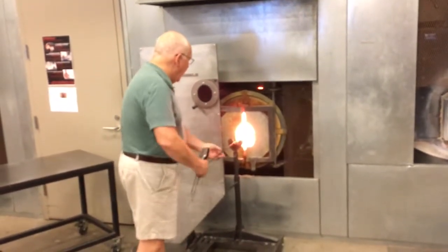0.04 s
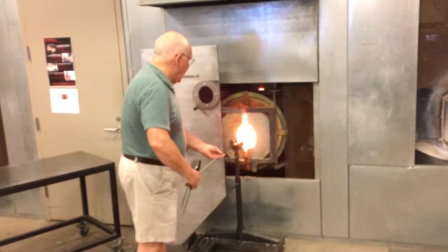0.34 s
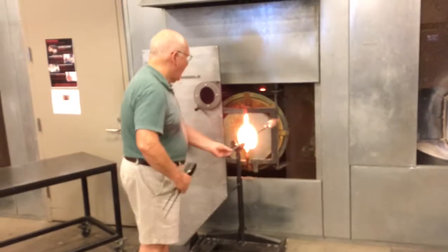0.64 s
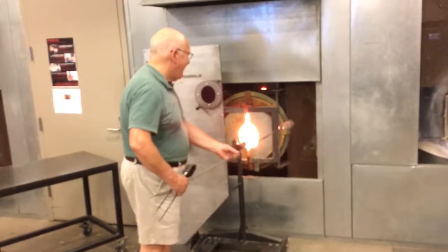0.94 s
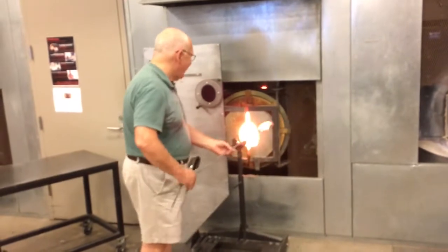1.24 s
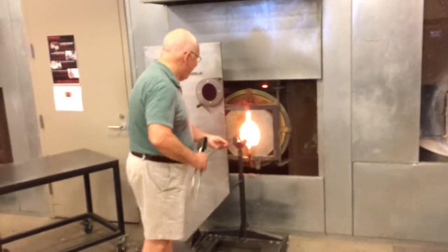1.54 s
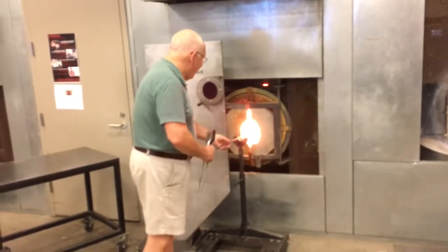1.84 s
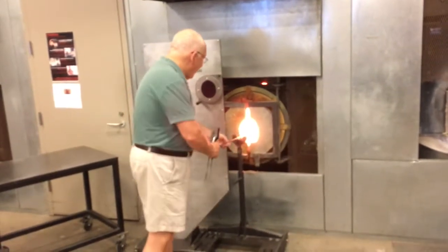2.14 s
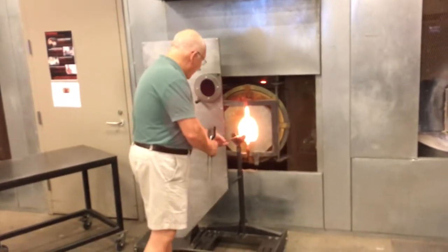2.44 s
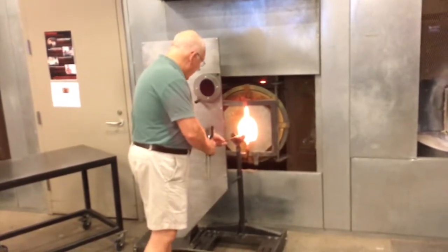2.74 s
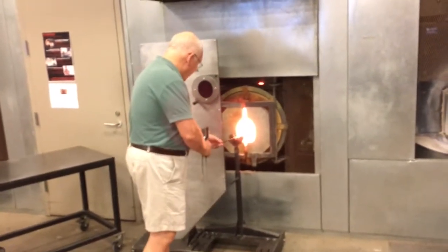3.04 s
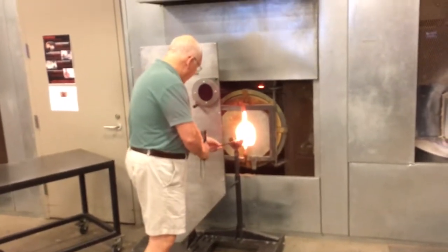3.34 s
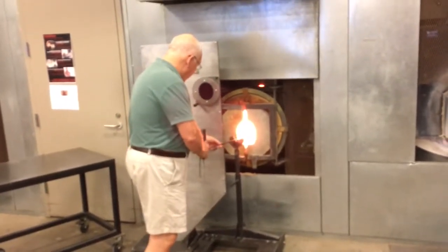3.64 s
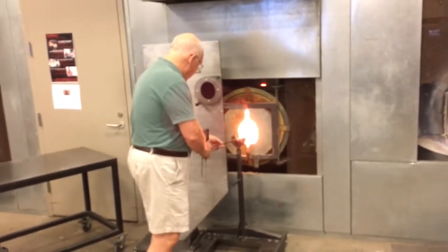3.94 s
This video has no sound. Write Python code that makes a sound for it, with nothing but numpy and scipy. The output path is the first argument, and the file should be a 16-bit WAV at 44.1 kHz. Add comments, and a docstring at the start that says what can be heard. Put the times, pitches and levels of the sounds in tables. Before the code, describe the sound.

A gas furnace roars steadily with rushing air, a tool clink and light shoe scuffs.

```python
"""A gas furnace roars steadily in a glass workshop as its swirling flame booms in the chamber.
Air from its blower and extraction hood rushes through ducts and hisses at the openings, and the
blower motor adds a thin, squeaky whine. A steel hand tool clinks. Shoes scuff and knock on the
concrete floor, grit ticks under them, and later something rings faintly. Hard walls give these
brief sounds a short echo."""
import sys
import numpy as np
from scipy import signal
from scipy.fft import rfft, irfft, next_fast_len
from scipy.io import wavfile
from scipy.ndimage import map_coordinates

SR = 44100
rng = np.random.default_rng(int(sys.argv[2]) if len(sys.argv) > 2 else 0)


def to_wav(sig):
    """Store sig (one row per channel, or 1-D mono) as 16-bit WAV at the path in sys.argv[1].

    Samples outside -1..1 are clipped; the rate is SR.
    """
    pcm = np.clip(np.atleast_2d(sig), -1, 1) * 32767
    pcm = np.round(pcm).astype(np.int16)
    wavfile.write(sys.argv[1], SR, pcm.T)  # frames by channels


N = 176400  # 4 seconds

# The deep tone of the flame (frequency [Hz], relative level [dB])
FLAME_TONE = [(15, -26), (25, -42), (40, -18.5), (55, -8.5), (65, -8.5), (75, 1.5), (88, -7.5), (102, -2.5),
              (128, -2.5), (152, 0.5), (185, -2), (214, -12), (234, -8), (280, -20), (315, -21), (360, -25),
              (420, -33.5), (510, -32.5), (550, -36), (750, -67)]


def furnace():
    """A swirling flame booms in the furnace chamber, with a slight flutter."""
    level_db = -24.5 + 0.5 * wobble(rate=8.74)
    return amp(level_db) * noise(FLAME_TONE)


# The tone of air in the hood and ducts (frequency [Hz], relative level [dB])
DUCT_TONE = [(320, -40), (555, -15), (600, 2.5), (705, 1), (765, -5), (820, -4.5), (920, 1.5), (985, -2),
             (1070, 0.5), (1150, -1), (1180, -11), (1250, -9.5), (1490, -11.5), (1640, -6.5), (1850, -14.5),
             (2040, -15.5), (2140, -11), (2220, -16), (2450, -11.5), (2700, -18.5), (2890, -19),
             (3080, -14), (3330, -21.5), (3600, -27.5), (4550, -51)]
# How the rush of air swells and eases (time [s], level change [dB])
DRAUGHT = [(0, 1), (.7, -0.1), (1.4, 0.16), (2.1, 0.1), (2.8, 0), (3.4, 0), (3.85, 1.5), (4, .5)]
# Evenly spaced peaks and dips that the blower puts in that tone (frequency [Hz], depth [dB])
BLOWER_RIPPLE = [(500, 15.5), (620, 0), (850, -1.2), (1080, 4.5), (1170, -6.5), (1400, 2)]
# The tone of the hiss at the openings (frequency [Hz], relative level [dB])
HISS_TONE = [(2500, -33), (3300, -5.5), (3550, -1.5), (4500, -2.5), (4950, -6), (5800, -4.5), (7000, -8.5),
             (8000, -8.5), (9700, -9.5), (10350, -18), (12000, -16.5), (14000, -21), (15700, -25)]


def ventilation():
    """Air, stirred once per turn of the blower, rushes through ringing ducts and hisses out."""
    turns_per_s = 35.6

    def ripple(hz):
        """Lift the tone at each multiple of the turning rate, or lower it if the depth is negative."""
        return amp(along(BLOWER_RIPPLE, hz) * np.cos(2 * np.pi * hz / turns_per_s))

    air = unit(filtered(noise(DUCT_TONE), ripple))
    draught_db = np.interp(clock(), *np.transpose(DRAUGHT))
    rush = amp(-42.5 + draught_db + 0.19 * wobble(rate=12)) * air
    hiss = amp(-57.5 + 0.3 * wobble(rate=4.45)) * noise(HISS_TONE)
    return rush + hiss


# Pairs of thin notes in the whine (multiple of the base pitch, lower note [dB], upper note [dB])
WHINE_PAIRS = [(9, -79, -74), (10, -74, -73.5), (11, -73.5, -74.5), (12, -81, -78), (18, -77.5, -77),
               (19, -78, -75.5), (21, -77, -75.5), (22, -78.5, -78.5), (23, -79, -77), (24, -88, -85),
               (32, -87, -95)]
# Moments when one note squeaks (peak time [s], pitch [Hz], half length [s], level [dB])
SQUEAKS = [(.27, 8037, .06, -67), (.33, 3872, .15, -66), (.6, 8037, .06, -69.5), (.92, 4722, .13, -66.5),
           (.94, 9304, .06, -67.5), (1.02, 4200, .09, -65), (1.1, 7603, .07, -67.5),
           (1.21, 4297, .065, -59), (1.6, 8037, .06, -68.5), (1.76, 4297, .08, -63),
           (1.8, 7603, .07, -68.5), (2.62, 4297, .11, -64), (2.83, 3872, .13, -63),
           (3.01, 8125, .06, -67.5), (3.66, 8125, .07, -66.5), (3.97, 8125, .06, -65)]


def blower_motor():
    """The motor whines: thin notes drift in pitch together, and now and then one swells to a squeak."""
    t, out = clock(), np.zeros(N)
    base_hz = 425.3 * (1 + 0.0011 * wobble(rate=6))
    offset_hz, jitter_hz = 44, 5
    for multiple, lower_db, upper_db in WHINE_PAIRS:
        for side, db in ((-1.2, lower_db), (1, upper_db)):  # just below and just above the multiple
            hz = multiple * base_hz + side * offset_hz + jitter_hz * wobble(rate=40)
            flicker_db = 5.5 * np.minimum(wobble(rate=0.6 * multiple), 1.2)  # faster for high notes
            gain = amp(db) * unit(amp(flicker_db))
            for peak_s, squeak_hz, half_length, peak_db in SQUEAKS:
                if abs(squeak_hz - hz.mean()) < offset_hz:
                    swell = amp(peak_db) * np.exp(-((t - peak_s) / half_length) ** 2)
                    gain = np.maximum(gain, swell)
            phase = 2 * np.pi * np.cumsum(hz) / SR
            out += gain * np.sqrt(2) * np.sin(phase)
    return out


# Steel hitting steel, twice in quick succession (time [s], level [dB])
CLINKS = [(1.4464, -42.5), (1.4497, -44.5)]
# The notes the tool rings with (pitch [Hz], relative level [dB], time to fade by 60 dB [s])
STEEL_NOTES = [(5350, -18, .08), (5733, -13.5, .12), (5900, -17, .07), (6013, -17, .15), (6630, -21, .16),
               (7014, -22, .15), (7897, -15, .11), (8479, -15, .11), (9400, -2, .02), (9750, -1, .018),
               (11620, 3, .012), (11950, -1, .01), (12280, -1, .014), (13760, -12, .03), (15400, -13, .02)]
# The tone of the sharp crack of each hit (frequency [Hz], relative level [dB])
CRACK_TONE = [(4000, -30), (5300, 0), (8000, 6), (9600, -2), (10700, -31), (11700, -10), (13000, -14),
              (15700, -10)]


def tool_clinks():
    """Steel chatters against steel: each hit makes a crack and sets the tool ringing."""
    t, out = clock(), np.zeros(N)
    for start, db in CLINKS:
        ring = np.zeros(N)
        for hz, note_db, fade_s in STEEL_NOTES:
            note = np.sin(2 * np.pi * (hz * t + rng.random()))
            ring += amp(note_db) * decay(start, fade_s) * note
        crack = amp(3) * decay(start, fade_s=0.009) * noise(CRACK_TONE)
        out += amp(db) * (ring + crack)
    return out + wall_echo(out)


# Soles sliding on the floor (peak time [s], rise [s], fall [s], rub level [dB], grit level [dB])
SCUFFS = [(.01, 0.035, 0.14, -48, -54.5), (2.025, 0.031, 0.028, -50, -56.5),
          (2.125, 0.021, 0.059, -48, -57), (2.245, 0.043, 0.02, -53, -65)]
# The tone of a rubbing sole (frequency [Hz], relative level [dB])
RUB_TONE = [(700, -46), (1400, -3), (1900, 1.5), (2500, -3.5), (2800, -11), (4500, -17), (8000, -41)]
# The tone of grit crackling under it (frequency [Hz], relative level [dB])
GRIT_TONE = [(2500, -18), (4000, -14), (6000, -1.5), (7800, -5), (8650, -2.5), (9300, -5), (10500, -10),
             (15700, -24)]
# Shoes landing on the floor (time [s], level [dB])
KNOCKS = [(1.982, -52), (2.1057, -44.5), (2.1935, -50), (2.2574, -54)]
# The tone of each landing (frequency [Hz], relative level [dB])
KNOCK_TONE = [(500, -4), (2000, 6), (2900, -5), (3500, 3), (4400, -2), (7000, -3), (9500, -7), (12000, -13),
              (15700, -26)]


def shoes():
    """Soles rub over gritty concrete and land with light knocks."""
    t, out = clock(), np.zeros(N)
    rub = noise(RUB_TONE)
    grit = crackle(GRIT_TONE, hits_per_s=900, spread_db=0.5)
    for peak_s, rise_s, fall_s, rub_db, grit_db in SCUFFS:
        rising = np.exp(-((t - peak_s) / rise_s) ** 2)
        falling = np.exp(-np.abs(t - peak_s) / fall_s)
        stroke = np.where(t < peak_s, rising, falling)
        out += stroke * (amp(rub_db) * rub + amp(grit_db) * grit)
    knock = noise(KNOCK_TONE)
    for start, db in KNOCKS:
        out += amp(db) * decay(start, fade_s=0.08) * knock
    return out + amp(-1.5) * wall_echo(out)


def crackle(tone, hits_per_s, spread_db):
    """Many tiny hits of random size blend into a crackle with the given tone."""
    hits = rng.random(N) < hits_per_s / SR
    signs = rng.choice([-1, 1], N)
    sizes = amp(spread_db * rng.standard_normal(N))
    lowest_hz = tone[0][0]
    return unit(filtered(hits * signs * sizes, lambda hz: amp(along(tone, hz)) * (hz > lowest_hz)))


# Small, hard touches, one note each (time [s], pitch [Hz], time to fade by 60 dB [s], level [dB])
TICKS = [(2.024, 8650, .035, -49), (2.1075, 3530, .03, -38.5), (2.127, 8550, .03, -50),
         (2.258, 8600, .03, -50), (3.348, 2470, .16, -47), (3.364, 2430, .06, -43)]


def small_ticks():
    """Grit ticks under the shoes, a knock rings briefly, and later something rings faintly."""
    t, out = clock(), np.zeros(N)
    rise_s = 0.001
    for start, hz, fade_s, db in TICKS:
        rise = np.clip((t - start) / rise_s, 0, 1)
        note = np.sin(2 * np.pi * hz * (t - start))
        out += amp(db) * rise * decay(start, fade_s) * note
    return out + amp(-8) * wall_echo(out)


# How long the echo lasts (frequency [Hz], time to fade by 60 dB [s])
ECHO_FADE = [(200, .6), (2000, .5), (6000, .22), (10000, .17), (15000, .14)]
# How strongly the walls send sound back (frequency [Hz], relative level [dB])
ECHO_TONE = [(3000, 0), (9800, 0), (11500, -5.5), (15000, -2)]


def wall_echo(x):
    """Sound bounces between hard walls; the highest part is weaker and dies first."""
    hz, t, bands = signal.stft(rng.standard_normal(SR // 2), SR, nperseg=256)
    fade = np.exp(-np.log(1000) * t / along(ECHO_FADE, hz)[:, None])
    tail = signal.istft(bands * fade, SR)[1]
    echo = signal.fftconvolve(x, tail / np.linalg.norm(tail))[:N]
    return filtered(echo, lambda hz: amp(along(ECHO_TONE, hz)))


def amp(db):
    """Turn decibels into a number to multiply by."""
    return 10 ** (np.asarray(db) / 20)


def unit(x):
    """Scale a signal to an average strength (rms) of 1."""
    return x / np.sqrt(np.mean(x ** 2) + 1e-20)


def along(points, hz):
    """Read between the rows of a (frequency [Hz], value) table, on a log frequency scale."""
    frequencies, values = np.transpose(points)
    return np.interp(np.log(hz + 1), np.log(frequencies + 1), values)


def clock():
    """The time of each sample in seconds."""
    return np.arange(N) / SR


def wobble(rate):
    """A smooth curve through `rate` random values a second."""
    return map_coordinates(rng.standard_normal(N // 10), [clock() * rate + 2])


def filtered(x, gain_at):
    """Turn each frequency in x up or down by gain_at(hz)."""
    size = next_fast_len(N + SR // 2)
    hz = np.fft.rfftfreq(size, 1 / SR)
    return irfft(rfft(x, size) * gain_at(hz), size)[:N]


def noise(tone):
    """Noise of strength 1, shaped by a tone table and silent beyond the table's ends."""
    hz = np.fft.rfftfreq(N, 1 / SR)
    inside = (hz > tone[0][0]) & (hz < tone[-1][0])
    white = rfft(rng.standard_normal(N))
    return unit(irfft(white * amp(along(tone, hz)) * inside, N))


def decay(start, fade_s):
    """A loudness curve that jumps up at start, then falls 60 dB in fade_s seconds."""
    age = clock() - start
    return (age >= 0) * np.exp(-np.log(1000) * np.abs(age) / fade_s)


def scene():
    """Everything heard from one spot in the workshop, in one channel."""
    return (furnace() + ventilation() + blower_motor() + tool_clinks() + small_ticks() + shoes())[None]


def record(dry):
    """Cut away the very highest treble."""
    top_hz = 15780
    return np.array([filtered(x, lambda hz: hz < top_hz) for x in dry])


dry = scene()
out = record(dry)
to_wav(out)
```